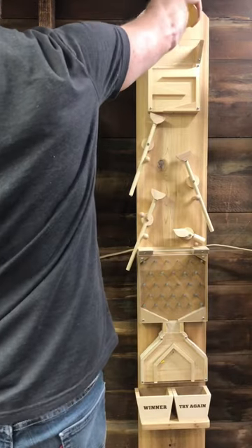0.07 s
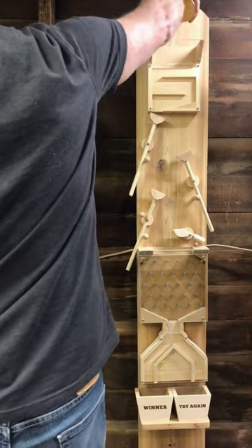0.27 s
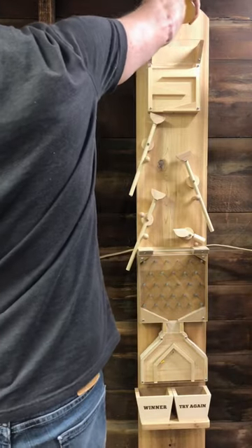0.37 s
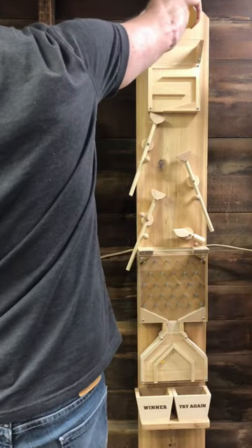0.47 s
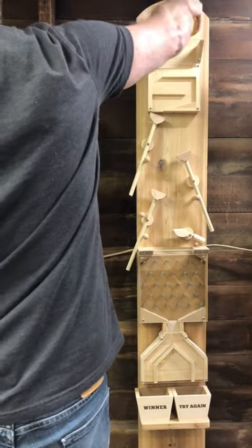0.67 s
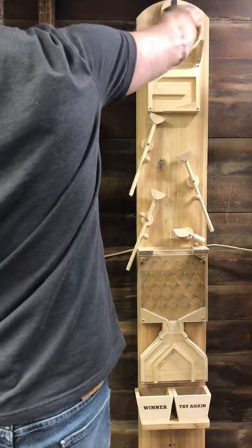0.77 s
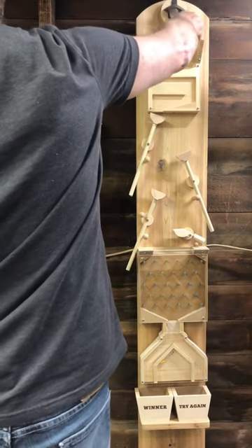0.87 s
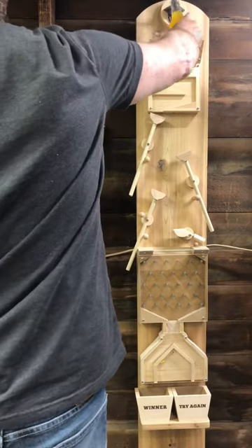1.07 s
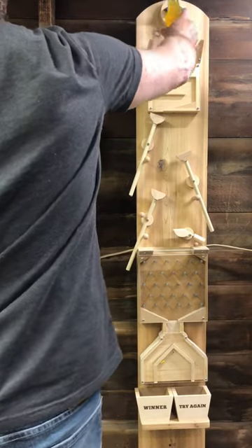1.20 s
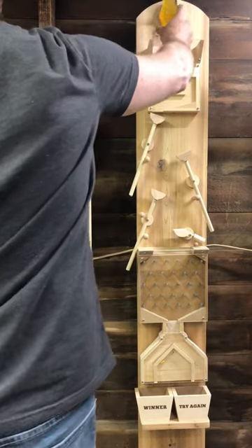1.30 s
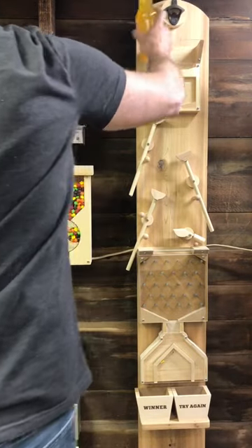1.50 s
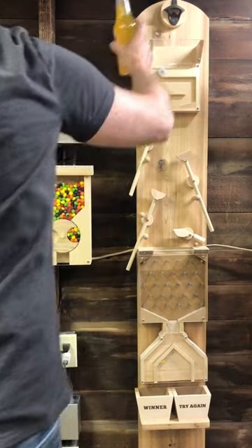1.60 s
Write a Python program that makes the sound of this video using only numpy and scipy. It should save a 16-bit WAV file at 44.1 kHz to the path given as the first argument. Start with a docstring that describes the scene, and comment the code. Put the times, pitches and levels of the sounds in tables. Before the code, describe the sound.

A glass bottle is opened on a wooden wall opener, knocking sharply against it at about 0.2 and 0.7 seconds. Around 0.9 seconds gas hisses briefly, the board thumps and the cap pings loose. After another knock near 1.1 seconds, the steel cap clatters down a wooden chute with bright ringing clicks, skids and hollow taps, fading by 1.6 seconds. The small, fairly dry room has a faint low rumble.

```python
"""A small, fairly dry room with a low steady rumble. A glass bottle knocks against a wall-mounted wooden
opener, setting the board ringing, and is levered open: gas hisses from the seal, the board thumps and
the cap's rim pings as it slips. The freed steel cap clatters down the wooden chute, clicking,
skidding and tapping a hollow ledge, while each hit keeps its bright ring alive."""
import sys
import numpy as np
from scipy import signal
from scipy.fft import rfft, irfft
from scipy.io import wavfile

SR = 44100
rng = np.random.default_rng(int(sys.argv[2]) if len(sys.argv) > 2 else 0)


def dump(signal):
    """Clip the signal to [-1, 1] and save it as 16-bit WAV at the path in sys.argv[1]."""
    limited = np.clip(np.atleast_2d(signal).T, -1, 1)
    pcm = np.round(limited * 32767).astype(np.int16)
    wavfile.write(sys.argv[1], SR, pcm)


N = 72765
T = np.arange(N) / SR
LOG_HZ = np.log(np.maximum(np.fft.rfftfreq(N, 1 / SR), 1))


def undb(db):
    return 10 ** (np.asarray(db) / 20)


def unit_rms(x):
    return x / np.sqrt(np.mean(x ** 2))


def fade(t60):
    """Exponential decay, 60 dB in t60 seconds."""
    return np.exp(-np.log(1000) * T / t60)


def delay(x, seconds):
    return np.concatenate([np.zeros(int(seconds * SR)), x])[:N]


def soften(x, hz, order=2):
    """Low-pass: a softer contact excites less treble."""
    return signal.sosfilt(signal.butter(order, min(hz, SR * .45), fs=SR, output="sos"), x)


def eq_gains(colour):
    """An EQ curve of (freq_hz, level_db) points as a gain for every frequency."""
    hz, db = np.array(colour).T
    return undb(np.interp(LOG_HZ, np.log(hz), db))


def noise(colour):
    """Steady coloured noise of rms 1."""
    return unit_rms(irfft(rfft(rng.standard_normal(N)) * eq_gains(colour), N))


def grainy(colour, grain_s=.001, rough_db=2.5):
    """Noise of rms 1 that sputters in uneven grains."""
    steady = noise(colour)
    edges = np.arange(0, T[-1], grain_s)
    sputter = np.interp(T, edges, rng.standard_normal(N)[:len(edges)])
    return unit_rms(steady * undb(rough_db * sputter))


def even_decay(white, t60, attack_s=0.00014):
    """Fading noise with an even spectrum, so that no single tone stands out."""
    half_fade = fade(2 * t60)  # applied before and after flattening
    x = white * half_fade * (1 - np.exp(-T / attack_s))
    for _ in range(3):
        flat_spectrum = np.exp(1j * np.angle(rfft(x)))
        x = irfft(flat_spectrum, N) * (T < 2 * t60)
    return x * half_fade / np.linalg.norm(x * half_fade)


def burst(colour, t60):
    """Many dense, short-lived modes struck at once; starts near rms 1."""
    cepstrum = irfft(np.log(eq_gains(colour)), N) * 2 * (np.arange(N) < N // 2)
    eq = np.exp(rfft(cepstrum))  # minimum phase keeps the attack sharp
    x = irfft(rfft(even_decay(rng.standard_normal(N), t60)) * eq, N)
    return x * np.linalg.norm(fade(t60)) / np.linalg.norm(x)


def ring(modes, detune=0):
    """Struck modes; neighbours swing in opposite directions."""
    out = 0
    for k, (hz, db, t60) in enumerate(modes):
        pitch_hz = hz * (1 + detune * rng.standard_normal())
        out += (-1) ** k * undb(db) * fade(t60) * np.sin(2 * np.pi * pitch_hz * T)
    return out


# Bass-heavy room tone: freq_hz, level_db
RUMBLE_EQ = [(30, 3), (55, -7), (100, -3.5), (138, 7), (190, -2.5), (400, -6.5), (900, -10), (2000, -19),
             (5000, -31), (16000, -43)]
def room_tone(level_db=-51):
    """A low, steady rumble under everything."""
    return undb(level_db) * noise(RUMBLE_EQ)


# Short reverb, longest in the bass: band_hz, level_db, t60_s
REVERB_BANDS = [(103, -1.5, 0.4), (393, -9, 0.17), (885, -11, 0.1), (2350, -7.5, .25), (5900, -7.5, 0.24),
                (14000, -8.5, 0.18)]
def room(x, predelay_s=.008):
    """Adds a small room's diffuse echoes, each band with its own level and decay."""
    hz, db, t60 = np.array(REVERB_BANDS).T
    white = rng.standard_normal(N)
    echoes = 0
    for k, share in enumerate(np.eye(len(hz))):
        tail = delay(even_decay(white, t60[k]), predelay_s)
        band = np.interp(LOG_HZ, np.log(hz), share)
        echoes += undb(db[k]) * rfft(tail) * band
    return x + signal.fftconvolve(x, irfft(echoes, N)[:N // 2])[:N]


# Tiny ring of the bottle neck: pitch_hz, level_db, t60_s
GLASS_MODES = [(4277, 5, 0.035), (7250, -11, 0.034)]
def glass_tick(start_s=.7015, level_db=-49):
    """The bottle's neck grazes the steel opener and rings briefly."""
    return undb(level_db) * delay(ring(GLASS_MODES), start_s)


# Dry scrape of steel on wood: freq_hz, level_db
SKID_EQ = [(300, -19), (1000, 3.5), (1900, 1.5), (2900, -2), (4700, -2), (5500, -10.5), (14000, -27)]
# Slides along the chute: start_s, length_s, level_db
SKIDS = [(1.183, 0.1, -47.5), (1.3, 0.023, -38.5), (1.369, 0.037, -40)]
def skidding_cap():
    """The crimped edge scrapes over the wood between hits."""
    swells = sum(undb(db) * np.sin(np.pi * np.clip((T - start_s) / length_s, 0, 1))
                 for start_s, length_s, db in SKIDS)
    return grainy(SKID_EQ) * swells


# Thin, peaky fizz: freq_hz, level_db
GAS_EQ = [(500, -1.5), (3700, -14), (4450, 2), (5200, -14), (5950, -7.5), (7200, -17.5), (8500, -4.5),
          (9800, -23.5), (11000, -13), (13500, -26), (15500, -16.5)]
# Fader curve of the hiss: time_s, level_db
HISS_CURVE = [(0.848, -63), (0.877, -35.5), (0.9, -49.5), (0.925, -48.5), (0.961, -42.5), (0.98, -57.5),
              (1.02, -63)]
def seal_hiss():
    """Gas sputters out from under the cap."""
    time_s, db = np.array(HISS_CURVE).T
    return grainy(GAS_EQ) * undb(np.interp(T, time_s, db, left=-np.inf, right=-np.inf))


# Dull body of the board: freq_hz, level_db
THUMP_EQ = [(35, -23), (80, -3.5), (200, -8), (450, 1.5), (680, 0.5), (820, -10.5), (1030, 0.5),
            (1400, -14), (3000, -23.5), (15000, -75)]
# Pushes on the opener: start_s, level_db, brightness_hz
THUMPS = [(0.402, -39.5, 891), (0.576, -40, 703.4), (0.879, -37, 1500), (0.9067, -23, 2030),
          (0.9403, -19.5, 5970), (0.953, -26.5, 6000)]
def lever_thumps():
    """Pushing and levering jolt the whole board as the cap gives way."""
    return sum(undb(db) * delay(soften(burst(THUMP_EQ, t60=0.11), bright_hz), start_s)
               for start_s, db, bright_hz in THUMPS)


# Woody note of the board: pitch_hz, level_db, t60_s
BOARD_MODES = [(523.7, -12, 0.072), (660, -8, 0.063), (742, -15, 0.11), (810, -7.5, 0.075),
               (950, -2.5, 0.072), (1155, -6.5, 0.035), (1300, -15, 0.05), (1435, -8, 0.049),
               (1584, -16, 0.085), (2004, -20.5, 0.13)]
def board_ring(detune):
    """The struck board rings, tuned a little differently on every hit."""
    return ring(BOARD_MODES, detune)


def radiate(x, cutoff_hz=365):
    """High-pass: the narrow board gives off little bass."""
    return signal.sosfilt(signal.butter(2, cutoff_hz, "high", fs=SR, output="sos"), x)


# Midrange clack of wood: freq_hz, level_db
CLACK_EQ = [(150, -15), (300, 1.5), (500, 1.5), (1000, 2), (1500, 2.5), (2100, -5), (3000, -3.5),
            (8000, -36)]
def wood_clack(t60):
    """The wood's dense modes blur into a pitchless clack."""
    return burst(CLACK_EQ, t60)


# Hollow note of the ledge: pitch_hz, level_db, t60_s
LEDGE_MODES = [(727.5, 1.5, 0.19), (1337, -7, 0.12)]
# Soft landings: start_s, level_db
LEDGE_TAPS = [(1.362, -35), (1.427, -40), (1.457, -40), (1.484, -40), (1.586, -48.5)]
def ledge_taps():
    """The cap drops softly on a hollow ledge."""
    out = 0
    for start_s, db in LEDGE_TAPS:
        tap = ring(LEDGE_MODES, detune=0.0055) + undb(-0.5) * wood_clack(t60=0.041)
        out += undb(db) * delay(tap, start_s)
    return out


# Bright ring of the steel cap: pitch_hz, level_db, t60_s
CAP_MODES = [(4657, 0, .31), (4738, -5, .27), (6820, -15, .1), (7870, -10, .13), (8200, -16, .12),
             (8640, -11, .09), (10930, -14, .1), (12250, -10, .09)]
# Pings as the rim slips: start_s, level_db, brightness_hz, flat_hz (lowest mode, at the onset)
RIM_PINGS = [(0.92, -44, 11100, -1), (0.95, -33.5, 10000, 12), (1.298, -28.5, 5470, 515)]
def slipping_rim(swell_s=0.004, glide_s=.007, damping_t60_s=0.58):
    """The cap's ring swells and glides to its free pitch as the rim lets go; the touching edge damps it."""
    lowest_hz = CAP_MODES[0][0]
    envelope = (1 - np.exp(-T / swell_s)) * fade(damping_t60_s)
    out = 0
    for start_s, db, bright_hz, flat_hz in RIM_PINGS:
        speed = 1 - flat_hz / lowest_hz * np.exp(-T / glide_s)
        ping = np.interp(np.cumsum(speed), np.arange(N), ring(CAP_MODES)) * envelope
        out += undb(db) * delay(soften(ping, bright_hz, order=4), start_s)
    return out


def clink(low_hz=2100, high_hz=13417, count=18, t60=0.044):
    """Each point of the crimped shell rings with its own handful of short, high modes."""
    modes = [(hz, -1.5, t60) for hz in rng.uniform(low_hz, high_hz, size=count)]
    return ring(modes) / np.sqrt(count)


# Crisp click of the cap's edge: freq_hz, level_db
CLICK_EQ = [(150, -29.5), (450, 1), (1000, 6), (2000, 1.5), (3100, 5), (5100, -0.5), (5800, -0.5),
            (10000, -4), (12700, -4), (14500, -1)]
# Hits down the chute: start_s, click_db, brightness_hz, wood_db, ring_db
CAP_HITS = [(1.085, -27, 14700, -45, -41), (1.111, -18.5, 13700, -23, -32),
            (1.159, -26.5, 14200, -31.5, -35.5), (1.198, -31, 12200, -33.5, -41),
            (1.297, -27.5, 3770, -61, -64), (1.3312, -29, 8700, -31, -34), (1.3579, -25, 13700, -25.5, -38),
            (1.4245, -30.5, 10100, -38.5, -45), (1.605, -51.5, 7100, -45, -62)]
def clattering_cap(echo_s=.0054, echo_db=-5):
    """The cap clicks and knocks the wood; a nearby surface echoes each hit about 5 ms later."""
    out = 0
    for start_s, click_db, bright_hz, wood_db, _ in CAP_HITS:
        click = soften(burst(CLICK_EQ, t60=0.041) + clink(), bright_hz, order=4)
        hit = undb(click_db) * click + undb(wood_db) * board_ring(detune=0.024)
        echo = undb(echo_db) * delay(hit, echo_s * rng.uniform(0.72, 1.2))
        out += delay(hit + echo, start_s)
    return out


def singing_cap():
    """The steel keeps ringing through the clatter: every hit adds energy to its modes."""
    out = 0
    for hz, db, t60 in CAP_MODES:
        energy = sum(delay(undb(db + ring_db) * fade(t60), start_s) ** 2
                     for start_s, *_, ring_db in CAP_HITS)
        out += np.sqrt(energy) * np.sin(2 * np.pi * (hz * T + rng.random()))
    return out


# Hard crack of glass on wood: freq_hz, level_db
CRACK_EQ = [(60, -4), (200, -0.5), (500, 7), (1000, 8), (1900, 7), (3600, -15), (4400, -3.5), (8200, -8),
            (9200, -18), (14000, -23.5)]
# Bottle strikes and their quick echoes: start_s, level_db, brightness_hz, punch_db, crack_db
KNOCKS = [(0.2040, -16, 3140, -0.5, -4), (0.2080, -12.5, 1730, 1, -15), (0.2174, -26.5, 3180, -9, -9.5),
          (0.7012, -17.5, 906, -3.5, -27), (0.7063, -23.5, 890, 6.5, -46), (0.777, -25.5, 554, -32, -50),
          (1.0853, -20.5, 4100, 10, -13.5), (1.0898, -26, 3000, 11, -3.5)]
def bottle_knocks(punch_hz=1014.4, sway_hz=56.5, sway_rise_s=0.024):
    """Glass hits with a sharp, doubled attack; the board rings and sways faintly on its mounting."""
    out = 0
    for start_s, db, bright_hz, punch_db, crack_db in KNOCKS:
        body = board_ring(detune=0.0055)
        punch = ring([(punch_hz, punch_db, 0.028)])  # the wood yields right under the contact
        clack = undb(-9) * wood_clack(t60=0.095)
        wood = soften(body + punch + clack, bright_hz)
        crack = undb(crack_db) * burst(CRACK_EQ, t60=0.085)
        sway = ring([(sway_hz, -31, 0.43)]) * (1 - np.exp(-T / sway_rise_s))
        out += undb(db) * delay(radiate(wood + crack) + sway, start_s)
    return out


def scene():
    """The bottle opens and the cap falls, in mono, with room reverb over the rumble."""
    opening = bottle_knocks() + glass_tick() + seal_hiss() + lever_thumps() + slipping_rim()
    falling = radiate(clattering_cap() + ledge_taps()) + singing_cap() + skidding_cap()
    return (room(opening + falling) + room_tone())[None]


def record(dry, low_cut_hz=54, high_cut_hz=15800):
    """Master EQ: trims the deep bass and the top of the treble."""
    thin = signal.sosfilt(signal.butter(4, low_cut_hz, "high", fs=SR, output="sos"), dry)
    return signal.sosfilt(signal.ellip(10, .2, 80, high_cut_hz, fs=SR, output="sos"), thin)


dry = scene()
out = record(dry)
dump(out)
```